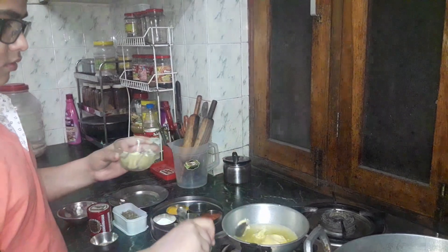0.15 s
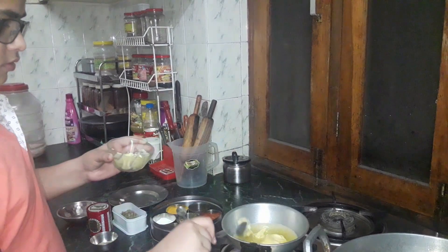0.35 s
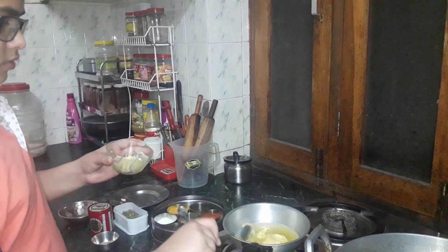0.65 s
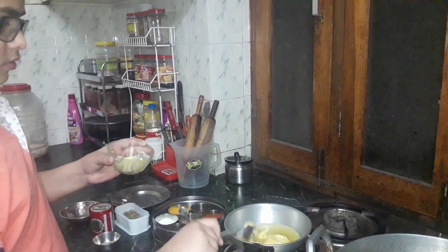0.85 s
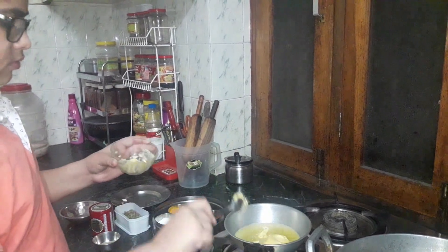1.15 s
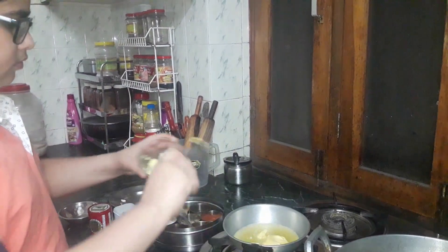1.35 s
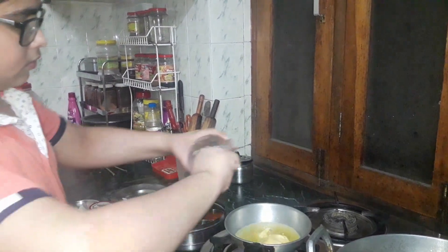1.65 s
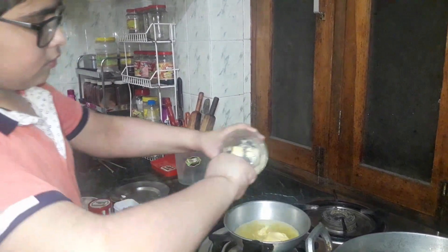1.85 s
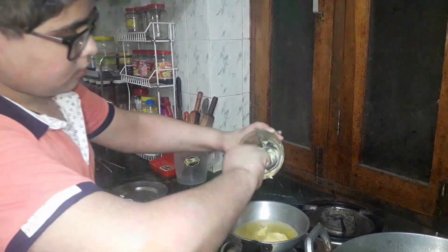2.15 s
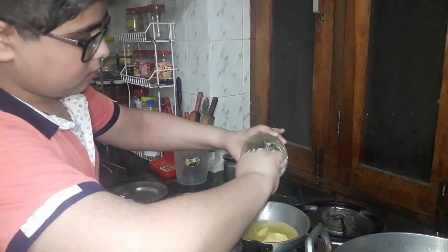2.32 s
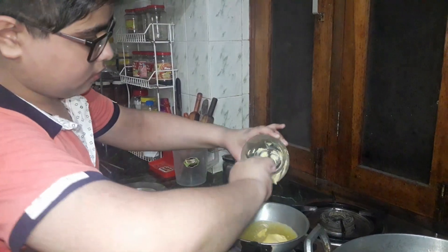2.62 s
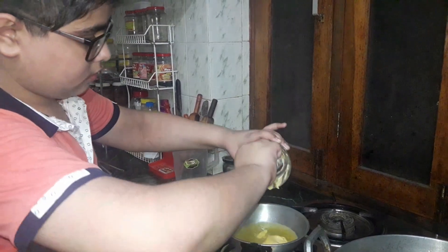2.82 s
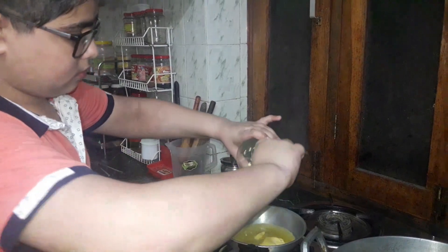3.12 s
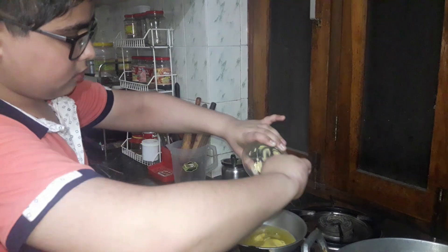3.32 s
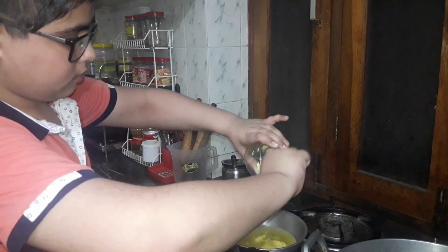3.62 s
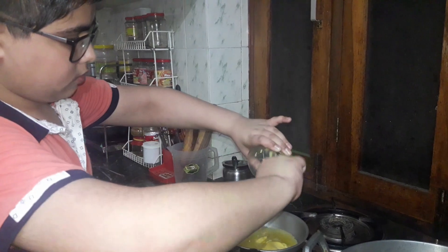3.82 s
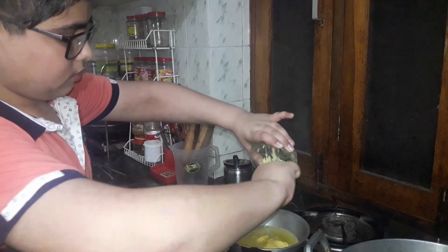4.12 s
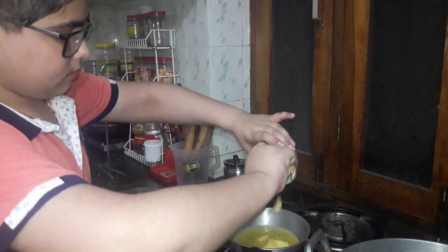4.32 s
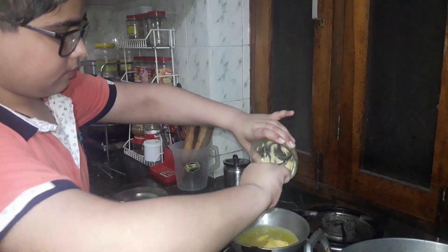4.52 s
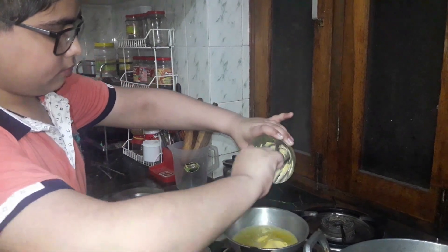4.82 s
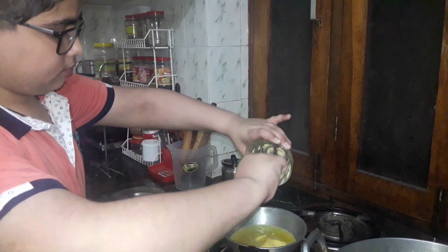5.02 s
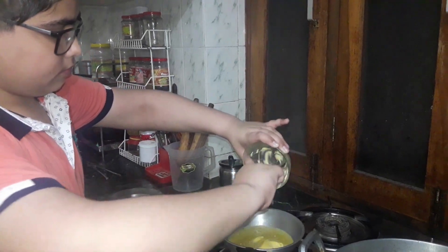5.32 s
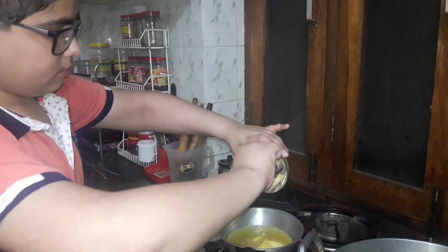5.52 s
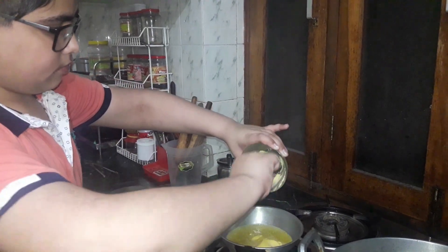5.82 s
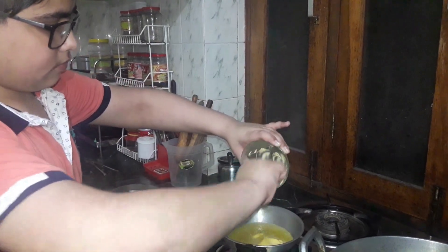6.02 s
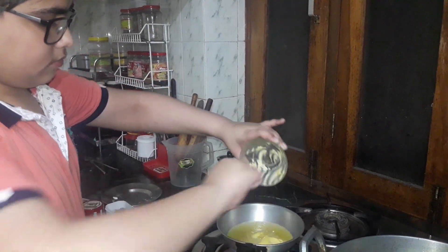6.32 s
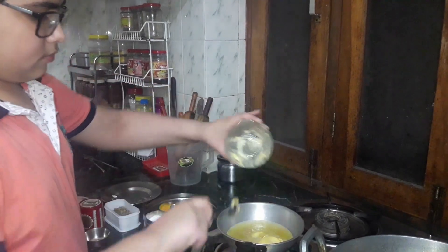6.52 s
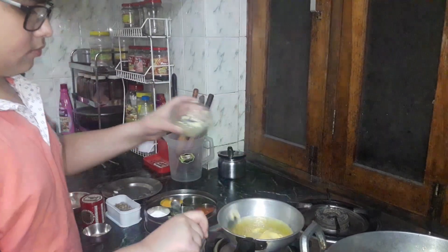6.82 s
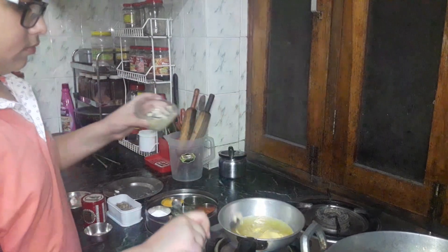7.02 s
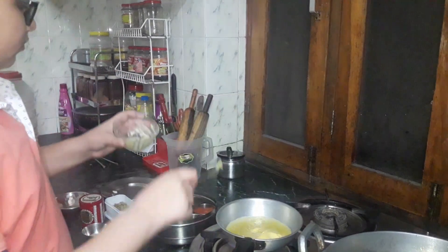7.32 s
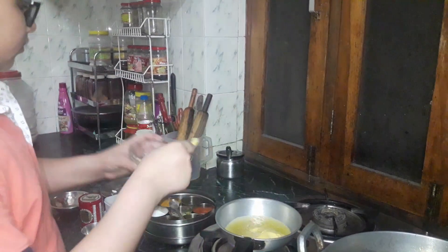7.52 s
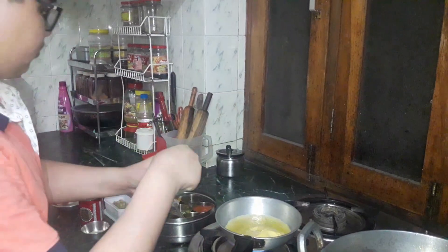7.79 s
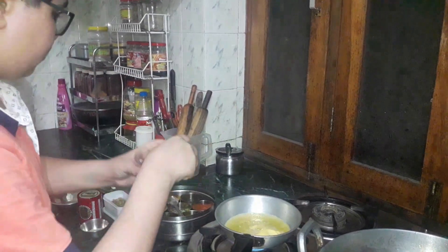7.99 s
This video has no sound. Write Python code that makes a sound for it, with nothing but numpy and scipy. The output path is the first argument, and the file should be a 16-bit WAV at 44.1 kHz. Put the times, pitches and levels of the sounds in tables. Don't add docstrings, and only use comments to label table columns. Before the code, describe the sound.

Fat sizzles steadily with sharp spits while a spoon knocks a steel pan's rim, then clinks and scrapes inside a small glass bowl, echoing off tiles.

```python
import sys
import numpy as np
from scipy import signal
from scipy.fft import rfft, irfft
from scipy.io import wavfile
from scipy.ndimage import uniform_filter1d, minimum_filter1d

SR = 44100
rng = np.random.default_rng(int(sys.argv[2]) if len(sys.argv) > 2 else 0)


def volts(x):
    e = np.asarray(x, float) / 20
    return 10 ** e


def to_wav(sig):
    pcm = np.clip(np.atleast_2d(sig), -1, 1) * 32767
    pcm = np.round(pcm).astype(np.int16)
    wavfile.write(sys.argv[1], SR, pcm.T)


N = 359415

# [f/Hz, level/dB per Hz]
BUBBLE_SPECTRUM = [(350, -50), (650, -30.5), (1450, -23), (1900, -16), (2900, -16), (3350, -9), (3800, -8),
                   (4900, -1), (5800, -8.5), (8300, -32.5), (11200, -14), (13000, -16), (15750, -7),
                   (16100, -63)]
LOW_SPLIT_HZ, TOP_SPLIT_HZ = 2900, 8300


def spectrum_gain(table, size):
    hz, db = np.transpose(table)
    bin_hz = np.arange(size // 2 + 1) * SR / size
    return volts(np.interp(np.log(bin_hz + 1), np.log(hz), db))


def colour(x, table):
    cepstrum = irfft(np.log(spectrum_gain(table, size=4096)))
    half = len(cepstrum) // 2
    cepstrum[1:half] *= 2
    cepstrum[half + 1:] = 0
    impulse = irfft(np.exp(rfft(cepstrum)))
    return signal.fftconvolve(x, impulse)[:N]


def band(x, lo_hz, hi_hz):
    return signal.sosfilt(signal.butter(3, [lo_hz, hi_hz], "band", fs=SR, output="sos"), x)


def unit(x):
    return x / np.sqrt(np.mean(x ** 2))


def peak(x):
    return x / np.abs(x).max(axis=-1, keepdims=True)


def fade(t60_s, length_s):
    t = np.arange(int(length_s * SR)) / SR
    return np.exp(-np.log(1000) * t / max(t60_s, .002))


def add(out, s, x):
    i = int(s * SR)
    out[i:i + len(x)] += x[:N - i]


def walk(rate_hz):
    hold = int(SR / rate_hz)
    steps = np.repeat(rng.standard_normal(N // hold + 1), hold)
    return unit(uniform_filter1d(uniform_filter1d(steps, hold), hold)[:N])


def bubbles(rate_hz, spread_db, flurry_db, hiss_db):
    sizes = volts(spread_db * np.minimum(rng.exponential(size=N), 3.8))
    grains = (rng.random(N) < rate_hz / SR) * rng.standard_normal(N) * sizes
    flurries = volts(flurry_db * np.minimum(walk(45), 1.5))
    hiss = volts(hiss_db) * rng.standard_normal(N)
    return colour(unit(grains) * flurries + hiss, BUBBLE_SPECTRUM)


def sizzle(mid_db, top_db, low_db):
    large = bubbles(3000, spread_db=1.5, flurry_db=4.0, hiss_db=3.0)
    fine = bubbles(5100, spread_db=2.5, flurry_db=3.0, hiss_db=1.0)
    low = band(large, 370, LOW_SPLIT_HZ)
    mid = band(large, LOW_SPLIT_HZ, TOP_SPLIT_HZ)
    top = band(0.35 * large + fine, TOP_SPLIT_HZ, 15130)
    out = unit(low) * volts(low_db + 0.9 * walk(15))
    out += unit(mid) * volts(mid_db + 0.57 * walk(19))
    return out + unit(top) * volts(top_db + 0.92 * walk(13))


def kitchen(db):
    # [f/Hz, level/dB per Hz]
    rumble_spectrum = [(15, -73), (25, -19), (69, -11), (102, -8.5), (202, -1), (279, -5.5), (313, -9.5),
                       (447, -6.5), (598, -14.5), (681, -14.5), (1200, -14.5), (1560, -44), (2640, -120)]
    rumble = colour(rng.standard_normal(N), rumble_spectrum)
    return unit(rumble) * volts(db + 1.0 * walk(5.11))


def cracks(rows, t60_s):
    out, size = np.zeros(N), 2048
    lead = size // 32
    hz = np.arange(1, size // 2 + 2) * SR / size
    mic = spectrum_gain(BUBBLE_SPECTRUM, size) ** 0.43
    for s, db, centre_hz, top_db in rows:
        decay = np.roll(fade(t60_s, (size + .5) / SR), lead)
        puff = rfft(rng.standard_normal(size) * decay) * mic
        mid = peak(irfft(puff * np.exp(-(np.log(hz / centre_hz) / 0.22) ** 2)))
        top = peak(irfft(puff * (hz > TOP_SPLIT_HZ)))
        add(out, max(s - lead / SR, 0), volts(db - 3.0) * (mid + volts(top_db - 3.0) * top))
    return out


def spits(sizzle_db):
    # [t/s, level/dB]
    loud_spits = [(0.0862, -8), (0.4774, -7), (0.9473, -2), (1.3866, -6.5), (1.7767, -18), (1.9393, -3.5),
                  (1.9677, -11), (2.3817, -6), (2.5017, -9), (2.9497, -5), (3.088, -9.5), (3.7993, -7),
                  (4.1155, -11), (4.1513, -5.5), (4.2116, -5), (4.3898, -13), (4.6162, -10), (5.531, -16),
                  (5.8556, -21), (6.3627, -9), (6.8548, -2.5), (6.9104, -8), (7.084, -13), (7.219, -5),
                  (7.3, -12), (7.72, -15), (7.884, -8), (7.9603, -11), (8.0054, -12), (8.0528, -8)]
    small_count, above_sizzle_db, scatter_db = 24, 8.5, 3
    small = []
    for when, size in rng.random((small_count, 2)):
        db = sizzle_db[int(when * N)] + above_sizzle_db + scatter_db * (2 * size - 1)
        small.append((when * N / SR, db))
    rows = loud_spits + small
    pitch_hz = 4800 * (1 + 0.02 * rng.standard_normal(len(rows)))
    top_db = -26
    return cracks([(s, db, hz, top_db) for (s, db), hz in zip(rows, pitch_hz)], t60_s=0.011)


def ring(modes, free=1, rough=1.0, rise_s=0.00019):
    length_s, waver_hz = .16, 220
    t = np.arange(int(length_s * SR)) / SR
    hz, db, t60_s = np.transpose(modes)[:, :, None]
    knots = rng.standard_normal((2, len(modes), int(length_s * waver_hz) + 2))
    k, share = np.divmod(t * waver_hz, 1)
    k = k.astype(int)
    waver = knots[..., k] * (1 - share) + knots[..., k + 1] * share
    waver *= 1 - np.exp(-t / 0.0046)
    weight = volts(db + 0.5 * knots[0, :, -1:])
    decay = weight * np.exp(-np.log(1000) * t / (t60_s * max(free, .2)))
    phase = 2 * np.pi * hz * t
    waves = (1 + rough * waver[0]) * np.sin(phase) + rough * waver[1] * np.cos(phase)
    return peak(np.sum(decay * waves, axis=0) * (1 - np.exp(-t / rise_s)))


def thud(lo_hz, hi_hz, t60_s, rise_s=.0001):
    rise = 1 - fade(np.log(1000) * rise_s, .2)
    burst = rng.standard_normal(SR // 5) * fade(t60_s, .2) * rise
    return peak(band(burst, lo_hz, hi_hz))


def pan():
    # [t/s, wall ring/dB, belly re wall/dB, rim re wall/dB, thud re wall/dB]
    knocks = [(0.1241, -32, -7.5, 2, 0), (0.3518, -20.5, -3, 9.5, 4.5), (0.3856, -18, -23, 2, -3),
              (0.527, -18, -6, 5, 1), (0.57, -23, -28, -4, -10), (0.6987, -17.5, -11, 4.5, 0.5),
              (0.7453, -23.5, -7.5, 6.5, -6), (0.876, -20.5, -9.5, 8, 2), (1.0482, -17, -11.5, 3.5, 0),
              (1.0834, -20, -13, 3, 2), (6.66, -23, -15, 2, 0.5), (6.7075, -31.5, -22, 0, -1),
              (6.884, -24, -13.5, 0, -4.5), (7.012, -13, -13.5, 1, -10), (7.0478, -17, -13.5, -13, -1),
              (7.548, -35.5, -20, -18, 7.5)]
    # [f/Hz, level/dB, t60/s]
    belly = [(202, -18.5, 0.16), (284, -12, 0.057), (412, -15, 0.11), (519, -3.5, 0.12), (666, -20, 0.033),
             (857, -13, 0.053)]
    wall = [(1040, -21, .1), (1091, -12.5, 0.23), (1305, -12.5, 0.25), (1827, 2, 0.18), (2060, -8, 0.13),
            (2180, -4, 0.33), (2467, -11, 0.19)]
    rim = [(3140, 18, 0.22), (3322, 37, 0.035), (3600, 2, 0.12), (4230, -12, 0.099), (4570, -13, .08),
           (4660, -20, .1), (5230, -23, .1), (7350, -17, .05)]
    knock_rise_s, belly_rise_s = .003, .006
    out = np.zeros(N)
    for s, db, belly_db, rim_db, thud_db in knocks:
        rings = ring(wall, rough=1.0, rise_s=knock_rise_s)
        rings += volts(belly_db + 8.0) * ring(belly, rough=0.17, rise_s=belly_rise_s)
        rings += volts(rim_db - 3.0) * ring(rim, rough=0.91, rise_s=knock_rise_s)
        add(out, s, volts(db - 1.64) * rings)
        add(out, s, volts(db + thud_db - 2.0) * thud(300, 3700, 0.38, knock_rise_s))
        add(out, s, volts(db + rim_db + 4.5) * thud(2780, 5680, 0.24, knock_rise_s))
    return out


def contacts():
    # [t/s, level/dB, centre f/Hz, top octave re level/dB]
    fronts = [(0.3537, -8, 4380, -15), (0.5272, -1, 4300, -16), (0.6989, 0.5, 4170, -21),
              (0.8754, -2, 4300, -2), (1.0485, 1, 4530, -11), (1.6505, -3, 4300, -3),
              (1.7292, -0.5, 5000, -10), (2.1377, -7, 4640, -15), (2.1872, -4.5, 4800, -22),
              (2.518, -4, 4940, -5), (2.5669, 3.5, 4970, -27), (2.8774, -6, 4870, -13),
              (2.9037, -1.5, 3860, -5), (3.254, 0.5, 4480, -9), (3.6052, -3.5, 5070, -14),
              (3.9604, -5, 5670, -8), (4.3476, -7, 4130, -1), (4.4443, -0.8, 4660, -24),
              (4.8982, 7, 5180, -15), (5.1766, -11, 4230, -7), (5.2358, -1.5, 3850, -12),
              (5.5656, 2, 5350, -7), (5.5667, -5, 5700, -12), (5.9439, -8, 5140, -6), (5.999, -2, 4160, -9),
              (6.125, -12, 5640, -15), (6.6613, -11, 4470, -16), (7.01, 2.5, 4260, -11.5),
              (7.7977, 1, 5070, -5), (8.1189, -3.5, 5560, -11)]
    return cracks(fronts, t60_s=0.013)


def spoon():
    # [t/s, level/dB, f/Hz]
    chimes = [(1.6472, -6, 11300), (1.729, -15, 11000), (2.1375, -11, 11100), (2.5182, -5.5, 11700),
              (2.857, -10, 11300), (2.9043, -12, 11200), (3.254, -14, 10900), (3.6052, -8, 11490),
              (3.9546, 0.5, 11600), (4.346, 0, 11870), (4.4448, -10, 10900), (4.8948, -2, 11050),
              (5.176, 0.5, 11860), (5.236, -11, 10600), (5.5665, 4, 11330), (5.9439, -8, 11800),
              (5.9993, -7, 11200), (7.6614, -12, 12600), (7.7974, -5.5, 10600), (8.1199, -4.5, 11600)]
    # [f/Hz, level/dB, t60/s]
    bending = [(10600, -15, 0.031), (10700, -24, 0.036), (11440, -8, 0.037), (12250, -21, .05),
               (12600, -35, 0.04)]
    out = np.zeros(N)
    for s, db, hz in chimes:
        add(out, s, volts(db - 10.5) * ring(bending + [(hz, 0, 0.042)], rough=0.97))
        add(out, s, volts(db - 12) * thud(0.918 * hz, 1.096 * hz, 0.093))
    return out


def bowl():
    # [t/s, hollow/dB, hollow f/Hz, second mode re hollow/dB, upper modes re hollow/dB]
    clinks = [(1.6475, -17, 1620, -3, -3), (1.7289, -11.5, 1400, -17, -16), (2.138, -15.5, 1410, -21, -11),
              (2.185, -12.5, 1620, -4, -8), (2.518, -15.5, 1550, -21, -18), (2.5692, -12.5, 1720, 6.5, 3),
              (2.8576, -23, 1420, -15, -13), (2.9034, -12, 1520, -1, -3), (3.254, -22.5, 1370, 1, -11),
              (3.6069, -17, 1660, -3.5, 7.5), (3.9566, -16.5, 1850, -2, 11.5),
              (4.346, -22.5, 1370, -10, -1), (4.4444, -14, 1650, 1, -2.5), (4.8971, -12, 1800, 6, 4),
              (5.1758, -22.5, 1370, -19, -1), (5.235, -17, 1550, -17, 0.5), (5.5666, -19, 1780, 2.5, 15),
              (5.9446, -24.5, 1370, -16, -14), (5.999, -16.5, 1790, -9, 1), (6.1243, -27, 1750, -3, 3),
              (7.7984, -8, 1540, -12, -14), (8.1201, -28, 1900, 0, 12.5)]
    # [t/s, hollow/dB, hollow f/Hz, second re hollow/dB, upper re hollow/dB]
    bounces = [
        (1.7483, -36, 1590, -6, -3),
        (2.585, -16, 1780, -5, -2),
        (4.909, -19, 1640, -12, 16.5),
        (4.944, -30.5, 1710, 12, 19.5),
        (4.9745, -36, 1660, 7, 2),
    ]
    # [f/Hz, level/dB, t60/s]
    low = [(1370, -19, 0.055), (1580, -5, 0.057), (1620, -5, 0.17), (1780, -4.5, 0.076)]
    second = [(3300, -9, 0.1), (3396, 8, 0.071), (3710, 5.5, 0.053), (3850, 0, 0.058)]
    upper = [(4640, -3, 0.052), (5250, -13, 0.048), (5950, -28, .07), (5560, 5.5, 0.12), (5700, 2, 0.087),
             (6020, -16, 0.086), (6070, -21, 0.048), (8200, -10, 0.059)]
    out = np.zeros(N)
    for s, db, hz, second_db, upper_db in clinks + bounces:
        free = 0.71 - 0.05 * (db + 26.5) + 0.01 * upper_db
        free += 0.34 * (s < 1.9)
        rings = ring(low + [(hz, 0, .06)], free)
        rings += volts(second_db + 8.5) * ring(second, free, rough=2.4)
        rings += volts(upper_db + 4.5) * ring(upper, free, rough=1.57)
        add(out, s, volts(db - 1.5) * rings)
        add(out, s, volts(db - 6) * thud(0.73 * hz, 1.63 * hz, 0.054))
    return out


def walls(x):
    t60_s, level_db = 0.46, -2.5
    dull = signal.lfilter([.3], [1, -.7], rng.standard_normal(SR // 2)) * fade(t60_s, .5)
    bright = rng.standard_normal(SR // 2) * fade(0.48 * t60_s, .5)
    echo = (2.24 * dull + bright) * (1 - fade(0.0052, .5))
    return volts(level_db) * signal.fftconvolve(x, echo / np.sqrt(np.sum(echo ** 2)))[:N]


def scene():
    # [t/s, sizzle/dB, rumble under the microphone's slow gain/dB]
    fry = [(0.0, -20.5, -47.5), (0.61, -21, -46), (1.0, -21.5, -44), (1.36, -22, -50.5),
           (2.11, -22.5, -48.5), (2.45, -21, -49), (3.04, -26, -53.5), (3.45, -26, -53), (4.22, -23.5, -51),
           (4.88, -23.5, -52), (5.01, -27.5, -54), (5.45, -28, -55), (5.97, -29, -56), (6.2, -29, -55),
           (6.67, -27.5, -56.5), (6.86, -26, -51.5), (7.17, -23.5, -50), (8.15, -22.5, -49.5)]
    s, *columns = np.transpose(fry)
    mid_db, rumble_db = (np.interp(np.arange(N) / SR, s, c) for c in columns)
    gap_db = rumble_db - mid_db + 27
    fat = sizzle(mid_db, top_db=mid_db - 5.5 + 0.28 * gap_db, low_db=mid_db - 15.5 + 0.46 * gap_db)
    mono = fat + kitchen(rumble_db + 2)
    sources = [(spits(mid_db) + contacts(), 1.5), (pan(), -12), (spoon() + bowl(), -1.6)]
    for hits, wet_db in sources:
        hits = band(hits, 167, 14600)
        mono += hits + volts(wet_db) * walls(hits)
    return np.array([mono, mono])


def top_cut(x):
    return signal.sosfilt(signal.butter(12, 16740, fs=SR, output="sos"), x)


def record(dry):
    dry = signal.sosfilt(signal.butter(2, 50, "high", fs=SR, output="sos"), dry)
    ahead = int(0.02 * SR)
    limit = np.minimum(1, 1.45 / (np.abs(dry[0]) + 1e-9))
    gain = uniform_filter1d(minimum_filter1d(limit, 2 * ahead), ahead)
    return top_cut(np.clip(dry * gain, -1, 1))


dry = scene()
out = record(dry)
to_wav(out)
```